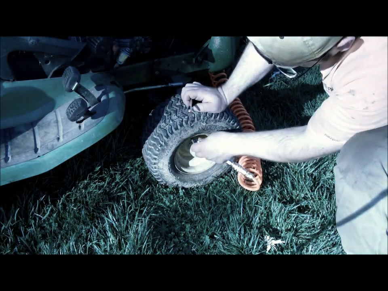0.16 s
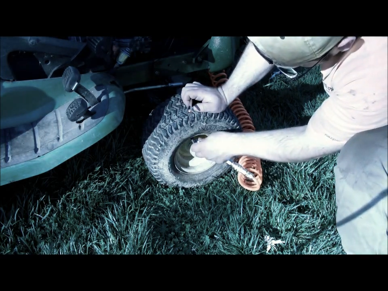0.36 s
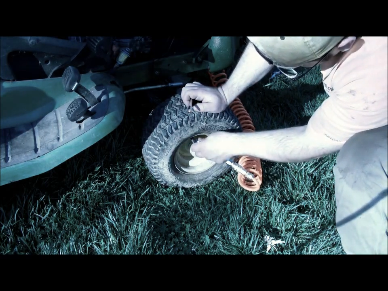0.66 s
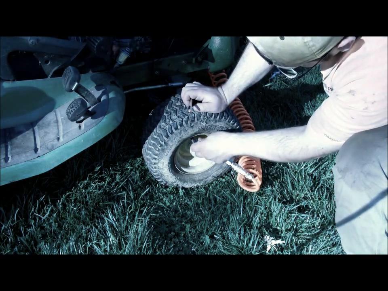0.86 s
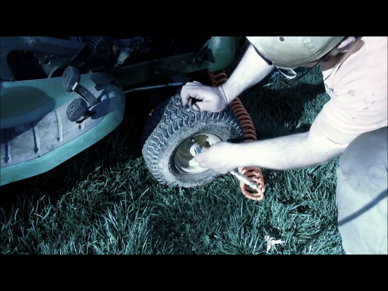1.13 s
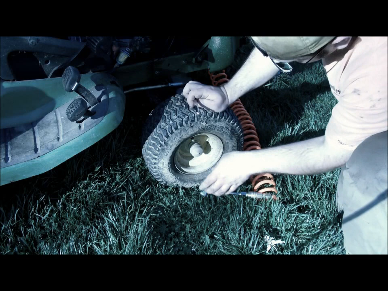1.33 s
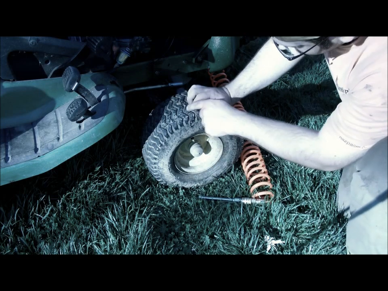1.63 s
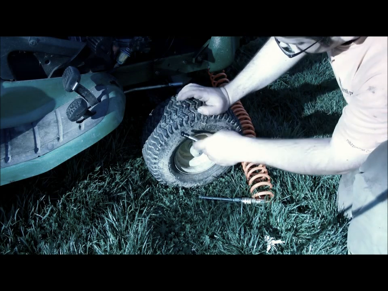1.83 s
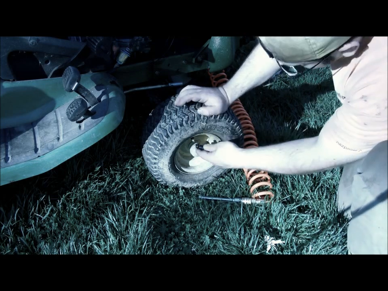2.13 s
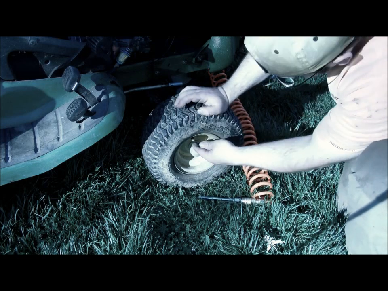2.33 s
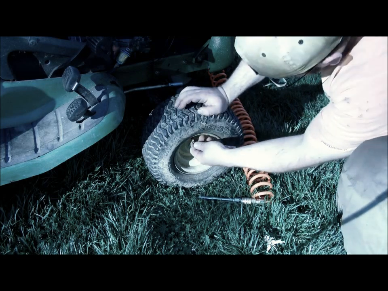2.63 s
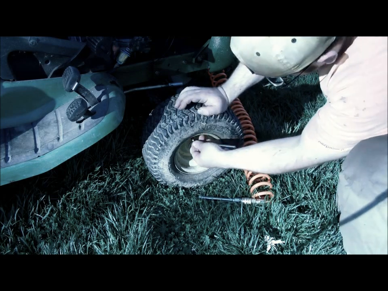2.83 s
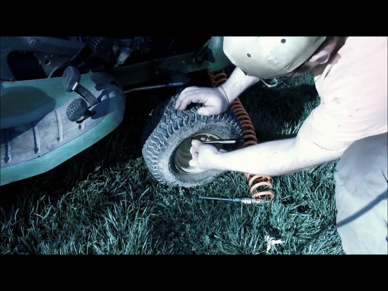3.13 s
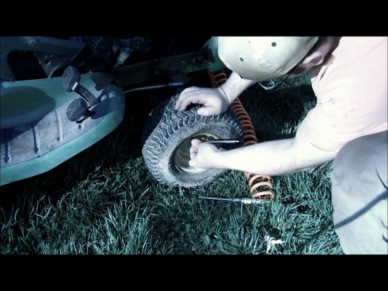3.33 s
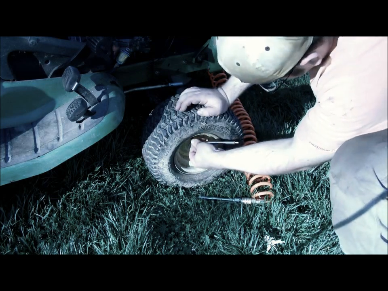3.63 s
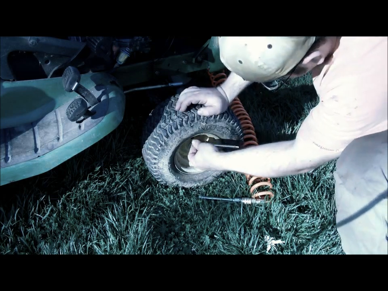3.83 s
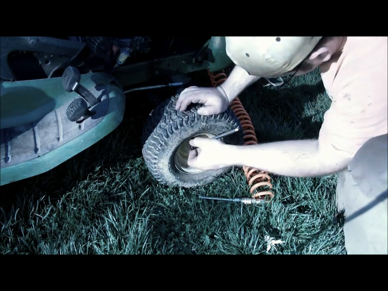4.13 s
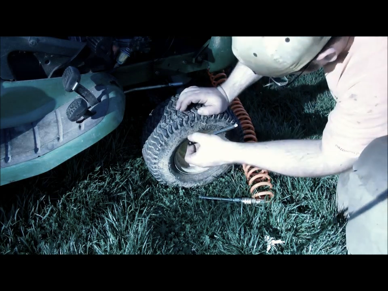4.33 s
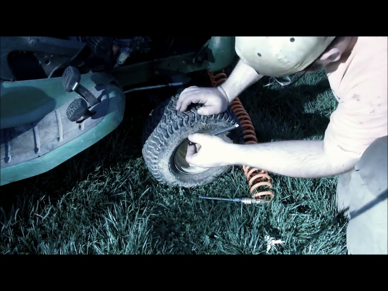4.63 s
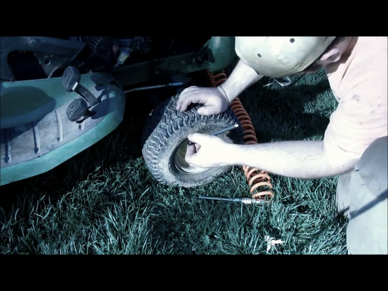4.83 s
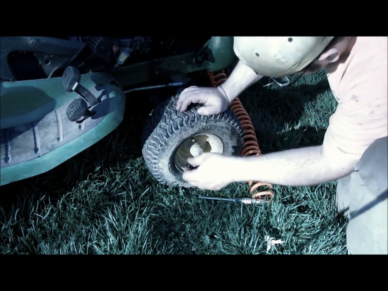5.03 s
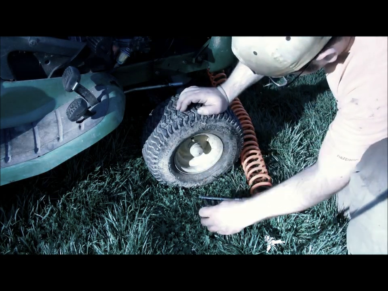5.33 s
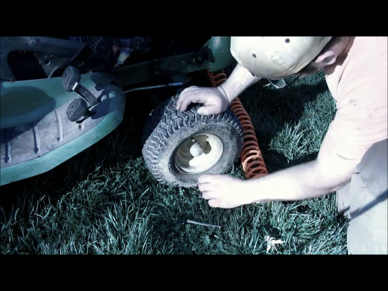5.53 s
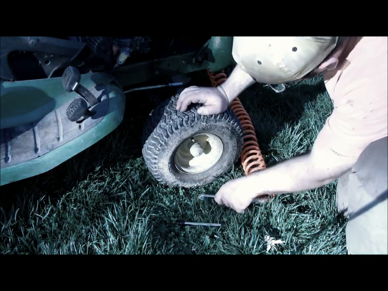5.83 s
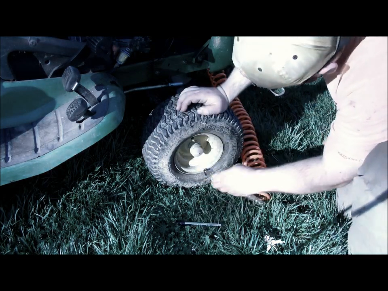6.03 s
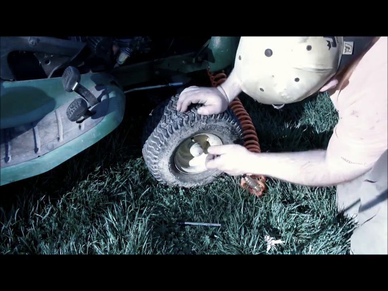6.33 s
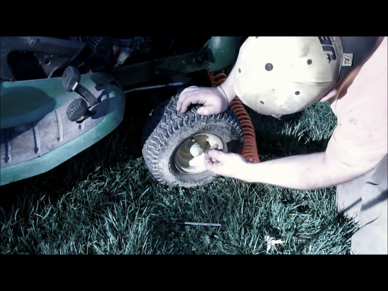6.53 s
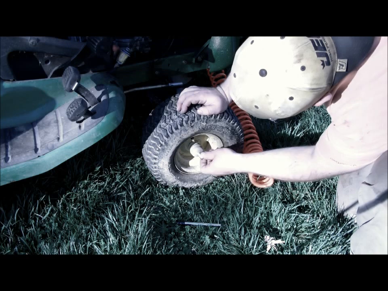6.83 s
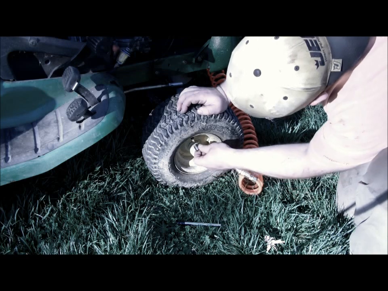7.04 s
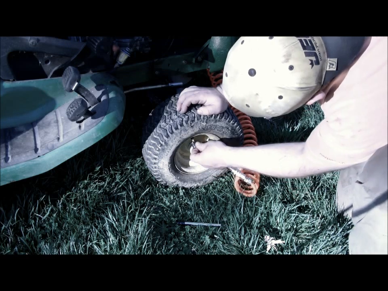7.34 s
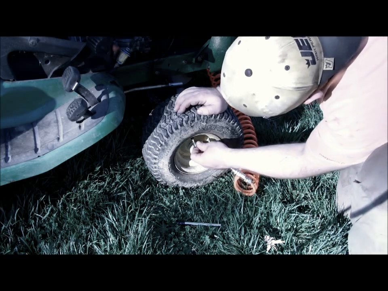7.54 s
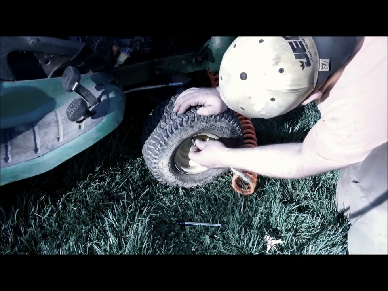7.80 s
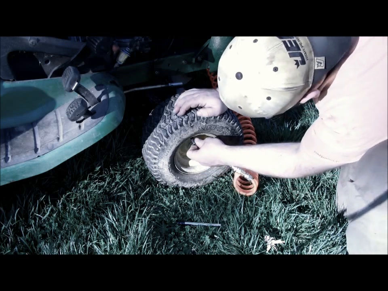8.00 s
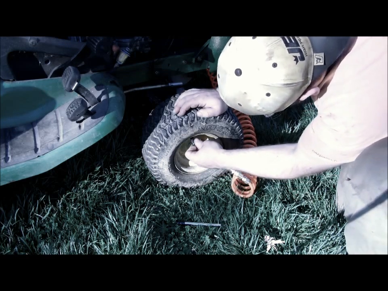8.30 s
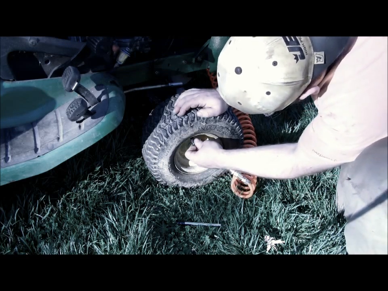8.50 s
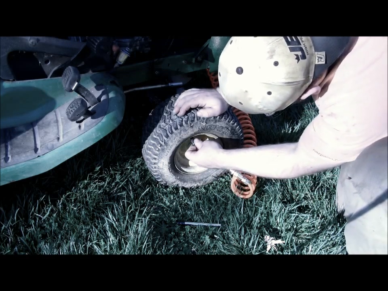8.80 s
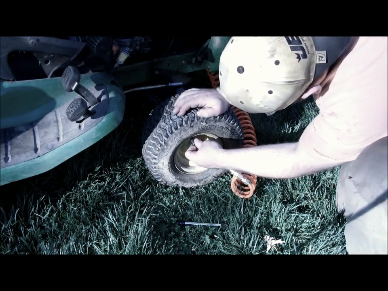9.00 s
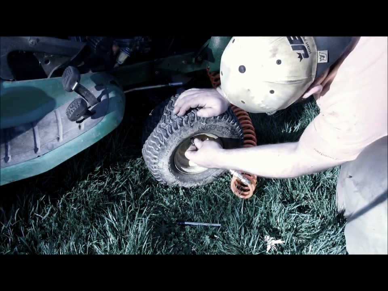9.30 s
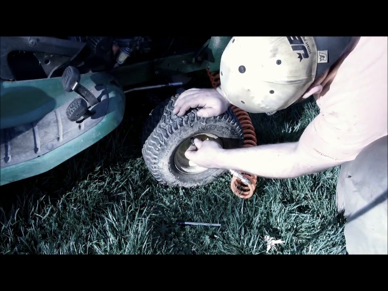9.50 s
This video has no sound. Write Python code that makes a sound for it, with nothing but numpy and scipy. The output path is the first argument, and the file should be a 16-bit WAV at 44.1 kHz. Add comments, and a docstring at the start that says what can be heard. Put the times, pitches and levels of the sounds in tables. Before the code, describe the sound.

Outdoors on a lawn, faint birds, far traffic and light rustling sit behind a thin leak at a tyre valve. The air chuck comes off close by with a sharp spit and a tiny pop. A small piston compressor farther away starts, spins up quickly and drones steadily with a fine metallic rattle. A few tiny spits of air follow, and near the end comes one short, bright blast.

```python
"""Tyre valve and air compressor

Far traffic, rustling and faint birds. Close by, a hand works an air chuck on a tyre valve: a thin
leak, spits of air, a pop as it comes off, a seep and, late on, one longer blast. Across the lawn a
small piston compressor starts at 1.5 s, spins up in a quarter of a second and drones on: each stroke
rings tank, housing and valve reeds over magnetic hum and fan whirr."""
import sys
import numpy as np
from scipy import signal
from scipy.fft import rfft, irfft
from scipy.io import wavfile
from scipy.ndimage import uniform_filter1d

SR = 44100
rng = np.random.default_rng(int(sys.argv[2]) if len(sys.argv) > 2 else 0)


def persist_wave(psi):
    """Save psi, clipped to +-1, as 16-bit WAV."""
    counts = np.round(np.clip(psi, -1, 1) * 32767).astype(np.int16)
    wavfile.write(sys.argv[1], SR, np.atleast_2d(counts).T)


N = 426006
T = np.arange(N) / SR
STROKE_HZ, FAINT_EDGE_HZ = 72.8, 15250

# ambience: (frequency [Hz], left-right coherence [0-1])
YARD_COHERENCE = [(60, 0.78), (180, 1), (550, 0.84), (1650, 1), (4970, 0.56), (15000, 0.24)]
# spits and seep: (frequency [Hz], relative density [dB])
SPIT_SPECTRUM = [(4710, -47), (8000, -16), (9350, -5.5), (11900, 3), (13500, -3.5), (14700, -7),
                 (15800, -14), (16000, -33)]
# chuck leaving the stem: (time [s], frequency [Hz], level [dB], t60 [s])
CHUCK_OFF = (1.203, 380, -40, .035)
# compressor: (frequency [Hz], left over right [dB])
PUMP_BALANCE = [(800, 1.1), (1000, 0), (5000, 0), (6400, 1.8), (8100, 4), (15000, 3)]


def gain_of(db):
    return 10 ** (np.asarray(db) / 20)


def unit_rms(x):
    return x / np.sqrt(np.mean(x ** 2) + 1e-20)


def drift(count, samples):
    """Unit-rms noise, smoothed over `samples`."""
    return unit_rms(uniform_filter1d(rng.standard_normal(count), size=samples))


def curve(points, top_hz=SR):
    """(Hz, value) points as a function of log frequency; 100 lower above top_hz."""
    f, value = np.transpose(points)
    return lambda hz: np.interp(np.log(hz + 1), np.log(f + 1), value) - 100 * (hz > top_hz)


def noise(colour_db, coherence, balance_db, patchy_db, count=N, lead_rad=np.zeros_like):
    """Unit-rms stereo noise with drifting patches; colour, coherence, balance, lead are curves in Hz."""
    frames, hz = count // 256 + 5, np.fft.rfftfreq(1024, 1 / SR)
    a, b, c, d, patches = rng.standard_normal((frames, 513, 5)).T
    patches = unit_rms(uniform_filter1d(uniform_filter1d(patches, size=10, axis=0), size=10, axis=1))
    alike, common = np.clip(coherence(hz), -1, 1)[:, None], a + 1j * b
    left = common * np.exp(1j * lead_rad(hz))[:, None]
    right = alike * common + np.sqrt(1 - alike ** 2) * (c + 1j * d)
    side_db = np.outer([.5, -.5], balance_db(hz))[..., None]
    spectra = np.array([left, right]) * gain_of(colour_db(hz)[:, None] + patchy_db * patches + side_db)
    return unit_rms(signal.istft(spectra, nperseg=1024, noverlap=768)[1][:, :count])


def yard_noise(colour_db, patchy_db):
    """Wide noise, slightly left."""
    return noise(colour_db, curve(YARD_COHERENCE), curve([(100, 1.2), (4000, .17), (9000, 1)]), patchy_db)


def traffic():
    """Far rumble, wandering in level."""
    # (frequency [Hz], relative density [dB])
    spectrum = [(25, -28), (55, -25), (120, -8.5), (280, -6.5), (540, 1.5), (950, 2), (1400, -4.5),
                (2500, -40.5)]
    # (time [s], level [dB])
    levels = [(0, -60.5), (.29, -58.5), (.55, -61.5), (.88, -63), (1.0, -57), (1.2, -57.5), (1.38, -62),
              (1.5, -60)]
    level_db = np.interp(T, *np.transpose(levels)) + 1.4 * drift(N, 3000)
    return yard_noise(curve(spectrum, 2500), patchy_db=1.6) * gain_of(level_db)


def rustle():
    """Cloth and grass: a thin bed with a few swishes."""
    # (frequency [Hz], relative density [dB])
    spectrum = [(900, -8.5), (1500, -4), (3700, -5.5), (6500, -8.5), (9000, -12), (12000, -9.5),
                (15200, -18)]
    # (centre [s], half-length [s], level [dB])
    swishes = [(.3, 0.18, -62.5), (0.553, 0.072, -62), (0.864, 0.095, -57.5), (1.013, 0.053, -55.5),
               (1.402, 0.044, -60)]
    power = gain_of(-63) ** 2
    power += sum(gain_of(db) ** 2 * np.exp(-((T - s) / half_s) ** 2) for s, half_s, db in swishes)
    return yard_noise(curve(spectrum, FAINT_EDGE_HZ), patchy_db=2.9) * np.sqrt(power)


def leak(level_db=-56, end_s=1.18):
    """Air creeping past the chuck seal whistles in narrow bands."""
    # (centre [Hz], width [Hz], relative level [dB])
    bands = [(10800, 170, -2), (11300, 170, 0), (12750, 220, -1), (13950, 130, 0), (11500, 5000, -11)]

    def colour_db(hz):
        power = sum(gain_of(db) ** 2 / (1 + (2 * (hz - f) / width) ** 2) ** 2 for f, width, db in bands)
        return 10 * np.log10(power) - 100 * (hz > FAINT_EDGE_HZ)
    out = np.zeros((2, N))
    out[:, :2 * SR] = noise(colour_db, curve([(9000, .79)]), curve([(9000, 5.8)]), 1.5, count=2 * SR)
    return out * gain_of(level_db) * np.clip((end_s - T) / .015, 0, 1)


def birds():
    """Faint gliding whistles, some warbling."""
    # (start [s], length [s], first [Hz], last [Hz], level [dB], pitch waver [fraction])
    notes = [(.1, 0.12, 4200, 3800, -59, 0.09), (.33, .1, 3900, 4200, -59, .04),
             (0.498, .1, 4300, 4040, -61, .03), (.69, .07, 4220, 3900, -60, 0.06),
             (.565, 0.12, 2850, 2430, -62, .012), (.585, .085, 1570, 1460, -59, 0.03),
             (.86, .09, 8600, 8900, -58, .012), (1.1, .07, 2600, 2750, -67, .012),
             (1.235, .04, 4300, 3900, -68, .012)]
    out = np.zeros(N)
    for start_s, length_s, first_hz, last_hz, db, waver in notes:
        u = np.linspace(0, 1, round(length_s * SR))
        hz = first_hz + (last_hz - first_hz) * u
        hz *= 1 + waver * drift(SR // 4, 150)[:len(u)]
        envelope = gain_of(db) * np.sin(np.pi * u ** .7)
        out[round(start_s * SR):][:len(u)] += envelope * np.sin(2 * np.pi * np.cumsum(hz) / SR)
    return out


def jet(colour_db, core_db, body_trim_db):
    """Air jet: a bright core to the left over a duller body, fluttered by the rubber seal."""
    # core: (frequency [Hz], left phase lead [rad])
    lead = [(8700, 0), (9100, .7), (10200, 1.3), (11700, .1), (12100, -.7), (13000, .9), (13500, .1)]
    # (frequency [Hz], relative density [dB])
    body_spectrum = [(250, -55), (1200, -14), (2500, -10), (2900, -5), (3400, -11), (4300, -6), (4850, -2),
                     (5400, -7), (6400, -5), (9000, -6)]
    n = len(core_db)
    coherence = curve([(9000, .86), (14000, .88)])
    balance_db = curve([(7000, 1.8), (10000, 6.7), (15000, 4.8)])
    core = noise(colour_db, coherence, balance_db, 1.4, count=n, lead_rad=curve(lead))
    body = noise(curve(body_spectrum, 10600), np.ones_like, curve([(6000, 0), (9000, 2)]), .68, count=n)
    flutter = unit_rms(gain_of(.86 * drift(n, 50)))
    return flutter * gain_of(core_db) * (core + body * gain_of(body_trim_db - 14.5))


def spits(t60_s=.019):
    """Short escapes of air: steep rise, hold, dying tail."""
    # (start [s], length [s], core level [dB], body trim [dB])
    bursts = [(1.177, 0.0063, -32, -6), (1.185, 0.0055, -20.5, -1), (1.193, .011, -15.5, 0),
              (1.214, .001, -38, -14), (1.219, .001, -33, 3), (3.346, .003, -41, -8),
              (3.362, .003, -46, -8), (3.946, .005, -29.5, 3), (3.952, 0.00084, -21.5, -7),
              (3.959, .004, -29, -1), (3.972, .001, -32, 5), (7.684, .028, -51, 17),
              (7.718, .003, -13.5, 3)]
    # a sizzle as the motor switches on: same columns
    sizzle = [(1.477, .016, -47, 8)]
    out = np.zeros((2, N))
    for start_s, length_s, peak_db, body_trim_db in bursts + sizzle:
        span = slice(round(start_s * SR) - 2000, round(start_s * SR) + 6000)
        t = T[span] - start_s
        rise_s = .0006 + .43 * length_s * (length_s < .015)  # a steady hiss starts at once
        shape_db = np.where(t < 0, 8.8 * t / rise_s, -60 * np.maximum(t - length_s, 0) / t60_s)
        out[:, span] += jet(curve(SPIT_SPECTRUM), peak_db + shape_db, body_trim_db)
    return out


def pop():
    """Hollow thump of the chuck leaving the stem."""
    start_s, hz, db, t60_s = CHUCK_OFF
    t = np.maximum(T - start_s, 0)
    return gain_of(db - 60 * np.minimum(t / t60_s, 3)) * np.sin(2 * np.pi * hz * t) * (t < 3 * t60_s)


def seep():
    """The valve seeps on once the chuck is off."""
    # (time [s], core level [dB])
    levels = [(1.2, -48), (1.23, -63), (1.33, -63), (1.4, -54), (1.45, -61)]
    core_db = np.interp(T, *np.transpose(levels))
    return jet(curve(SPIT_SPECTRUM, FAINT_EDGE_HZ), core_db, body_trim_db=-6) * (T > CHUCK_OFF[0])


def hum(turns, slip, hum_hz=240, on_s=1.474, surge_db=7.5):
    """Magnetic hum beating with the shaft; current surges at the start."""
    # (offset from hum_hz [stroke rates], rms level at speed [dB])
    beats = [(0, -60.5), (3, -65), (6, -69.5), (8, -69), (12, -68.5)]
    tones = sum(np.sqrt(2) * gain_of(db) * np.sin(2 * np.pi * (hum_hz * T + k * turns))
                for k, db in beats)
    return tones * np.clip((T - on_s) / .0044, 0, 1) * gain_of(surge_db * np.clip(3 * slip, 0, 1))


def whirr(turns, slip, level_db=-47, on_s=1.476):
    """Fan, brushes and air around the motor, puffing once a stroke."""
    # (frequency [Hz], relative density [dB])
    spectrum = [(25, -21), (50, -26), (200, -10.5), (480, 0), (950, -10), (1200, -2.5), (2600, -7),
                (2950, -3), (3200, -7.5), (5500, -9.5), (6150, -4.5), (6400, -0.5), (6650, -4),
                (7200, -7.5), (8100, -4.5), (8600, -7.5), (13000, -4), (15100, -11.5)]
    # (frequency [Hz], left-right coherence [0-1])
    coherence = [(60, .98), (150, 1), (2700, 1), (2950, .92), (3200, 1), (5000, 1), (6000, .8), (8000, .45),
                 (15000, .1)]
    air = noise(curve(spectrum, FAINT_EDGE_HZ), curve(coherence), curve(PUMP_BALANCE), patchy_db=.95)
    puffing = 1 + .025 * np.cos(2 * np.pi * (turns - .55))
    return air * puffing * gain_of(level_db - 7.1 * slip) * np.clip((T - on_s) / .028, 0, 1)


def housing_ring(orders):
    """Ring of tank and housing, delayed by band so each stroke sounds spread out, less peaky."""
    # (frequency [Hz], delay [strokes])
    lags = [(190, 0.049), (240, 0.44), (420, 0.32), (470, 0.65), (530, 0.5), (600, 0.038), (900, 0.319),
            (1000, 0.598), (1300, 1.049), (1450, 0.296), (1900, 1.092), (2100, 0.065), (2500, 0.355),
            (2800, 0.37), (3100, 0.595), (3500, 0.08)]
    hz = np.fft.rfftfreq(16384, 1 / SR)
    k, db = np.transpose(orders)
    colour_db = np.interp(hz, np.r_[0, k, k[-1] + 1] * STROKE_HZ, np.r_[db[0] - 20, db, db[-1] - 20])
    log_gain = np.log(gain_of(colour_db))
    phase = -signal.hilbert(np.r_[log_gain, log_gain[-2:0:-1]]).imag[:len(hz)]  # minimum phase
    phase -= 2 * np.pi * np.cumsum(curve(lags)(hz)) * hz[1] / STROKE_HZ
    return irfft(np.exp(log_gain + 1j * phase))[:8192]


def tank(turns, slip, pressure, blow_gain):
    """One blow a stroke rings tank and housing; colour follows speed and pressure."""
    # slow strokes, dull with a 1.3 kHz clank: (multiple of STROKE_HZ, gain [dB])
    slow_orders = [(2, -28), (3.3, -18), (5, -11), (7, 7.5), (8.5, -32), (14, -37), (18, -6), (20, -31),
                   (40, -37), (48, -23)]
    # at speed, tank low and tank full: same columns
    low_orders = [(1, -55), (2, -20), (3, -3.5), (4, -12.5), (5, -7), (6, -2), (7, 1.5), (8, -11.5),
                  (9, -20.5), (10, -23), (11, -23.5), (12, -22.5), (13, -44.5), (14, -22), (15, -18.5),
                  (16, -14.5), (17, -25.5), (18, -26), (19, -22), (20, -29.5), (21, -26.5), (22, -30.5),
                  (23, -23.5), (24, -27), (25, -21.5), (26, -31.5), (27, -23.5), (28, -25), (29, -41),
                  (30, -21), (31, -16.5), (32, -12.5), (33, -37), (34, -41), (35, -25.5), (36, -38),
                  (37, -29), (38, -24.5), (39, -17.5), (40, -10), (41, -36.5), (42, -27.5), (43, -43),
                  (44, -51), (45, -18), (46, -25), (47, -30.5), (48, -18.5)]
    full_orders = [(1, -62), (2, -20), (3, -2), (4, -11), (5, -9.5), (6, -3), (7, 1), (8, -10), (9, -23),
                   (10, -17.5), (11, -21), (12, -15.5), (13, -56), (14, -33), (15, -20), (16, -25),
                   (17, -28.5), (18, -41), (19, -36), (20, -20.5), (21, -12.5), (22, -27), (23, -16),
                   (24, -32), (25, -17), (26, -42.5), (27, -16.5), (28, -65), (29, -17), (30, -17),
                   (31, -21), (32, -45), (33, -29), (34, -33), (35, -68), (36, -41), (37, -52), (38, -29),
                   (39, -18), (40, -9.5), (41, -17.5), (42, -12.5), (43, -38), (44, -21), (45, -16.5),
                   (46, -36), (47, -60), (48, -22)]
    half_angle = np.pi * (turns + 1e-9)
    blows = (np.sin(97 * half_angle) / np.sin(half_angle) - 1) * blow_gain  # 48 harmonics
    slow, low, full = (signal.oaconvolve(blows, housing_ring(orders))[:N]
                       for orders in (slow_orders, low_orders, full_orders))
    at_speed = (1 - pressure) * low + pressure * full
    slow_share = np.minimum(3.4 * slip, 1)
    return .39 * (slow_share * slow + (1 - slow_share) * at_speed)  # 0 dB blows: about unit rms


def struck_mode(turns, stroke_hz, hz, db, t60_s, place, scatter):
    """A mode struck once a stroke, with scatter in level and phase."""
    stroke = np.floor(turns - place + 1).astype(int)
    since_s = (turns - place + 1 - stroke) / stroke_hz
    envelope = gain_of(db + .65 * scatter[stroke, 0] - 60 * since_s / t60_s)
    contact = np.minimum(since_s / .0013, 1) * (stroke > 0)
    return contact * envelope * np.sin(2 * np.pi * hz * since_s + .23 * scatter[stroke, 1])


def reeds(turns, stroke_hz, slip, pressure, scatter):
    """Valve reeds and cover ring on every stroke."""
    # (mode frequency [Hz])
    modes_hz = [3750, 4297, 4700, 5230, 5890, 6400, 6850, 7170, 7690, 8130, 8450, 8850, 9200, 9670, 10040,
                10340, 10750, 11200, 11700, 12280, 12820, 13200]
    # per mode: (level [dB], gain at full pressure [dB], t60 [s], place in stroke [turns])
    modes = [(-54, -11, 0.063, 0.57), (-59.5, 0, 0.07, 0.84), (-53, -2.5, 0.029, 0.25),
             (-56.5, 2.5, 0.071, .52), (-54, -4, 0.047, 1), (-39.5, 0, 0.026, .92), (-59, 9, 0.03, 0.534),
             (-55, 0, 0.067, 0.41), (-57.5, 0, 0.067, 0.514), (-49.5, 1.5, 0.053, 0.477),
             (-53.5, 1, 0.018, .1), (-49.5, 1, 0.022, 1), (-60, 0, 0.026, .3), (-51.5, -2, 0.044, 0.5),
             (-61, -4, 0.048, .6), (-51, -1, 0.072, 0.12), (-51, 2, 0.044, .4), (-47.5, -1.5, 0.04, 0.66),
             (-62, 10, 0.034, .15), (-56, 8, .04, .35), (-53.5, -3, 0.077, .5), (-61, 3, 0.037, 0.74)]
    out = np.zeros(N)
    for k, (db, fill_db, t60_s, place) in enumerate(modes):
        level_db = db + fill_db * pressure - 22 * slip
        out += struck_mode(turns, stroke_hz, modes_hz[k], level_db, t60_s, place, scatter[:, k])
    return out


def squeal(turns, stroke_hz, scatter, hz=2908, rise_db_per_s=400, fall_db_per_s=98):
    """A squeal flares twice as the speed settles."""
    # (time [s], peak level [dB])
    flares = [(1.65, -43), (1.8, -36)]
    flares_db = [db - np.where(T < s, rise_db_per_s * (s - T), fall_db_per_s * (T - s))
                 for s, db in flares]
    level_db = np.max(flares_db, axis=0).clip(-120)
    return struck_mode(turns, stroke_hz, hz, level_db, t60_s=.1, place=.5, scatter=scatter)


def whine(turns, stroke_hz, scatter, hz=4297, peak_db=-55, peak_s=3.85, width_s=1.2):
    """A thin whine swells and fades while the tank fills."""
    level_db = (peak_db - 8 * ((T - peak_s) / width_s) ** 2).clip(-120)
    return struck_mode(turns, stroke_hz, hz, level_db, t60_s=.089, place=.7, scatter=scatter)


def compressor(start_s=1.499, top_hz=72.86, fill_s=3.5):
    """The pump nears top speed fast, then creeps; its shaft times every part as the tank fills."""
    # (frequency [Hz], left phase lead [rad])
    lead = [(5000, 0), (6400, -0.51), (8100, -1.36), (9700, -1), (11200, -1.8)]
    on, t = T >= start_s, np.maximum(T - start_s, 0)
    stroke_hz = top_hz - 27 * np.exp(-t / .07) - .6 * np.exp(-t / .75)
    turns = np.cumsum(stroke_hz * on) / SR - .1  # first blow a tenth of a turn in
    slip = np.clip(1 - stroke_hz / STROKE_HZ, 0, 1)
    pressure = .74 * (1 - np.exp(-t / fill_s))  # 0 empty, 1 full
    scatter = rng.standard_normal((int(turns[-1]) + 2, 24, 2))  # stroke, part, level or phase
    lurch_db = 5 * np.exp(-((t - .08) / .018) ** 2)  # a few early blows land harder
    uneven_db = (.1 + 6 * slip) * scatter[np.round(turns).astype(int), -1, 0]
    blow_db = -35.5 - 13 * (1 - stroke_hz / top_hz) + lurch_db + uneven_db
    mono = hum(turns, slip) + tank(turns, slip, pressure, gain_of(blow_db) * on)
    mono += reeds(turns, stroke_hz, slip, pressure, scatter)
    mono += squeal(turns, stroke_hz, scatter[:, -2]) + whine(turns, stroke_hz, scatter[:, 1])
    hz = np.fft.rfftfreq(N, 1 / SR)
    balance = gain_of(np.outer([.5, -.5], curve(PUMP_BALANCE)(hz)))
    phase_shift = np.exp(np.outer([.5j, -.5j], curve(lead)(hz)))
    return irfft(rfft(mono) * balance * phase_shift * (hz < FAINT_EDGE_HZ), N) + whirr(turns, slip)


def blast(start_s=7.716, open_s=.0081, swell_s=7.88, shut_s=7.9, end_s=7.958):
    """A longer jet: opens with a kick, swells late, shuts off; its body thins throughout."""
    # core: (frequency [Hz], relative density [dB])
    spectrum = [(5000, -67), (7800, -31), (9000, -13), (9900, -3.5), (10350, 3.5), (11000, -0.5),
                (12500, -7), (13700, -5), (15000, -9), (15400, -14)]
    span = slice(round(7.71 * SR), round(7.97 * SR))
    t = T[span]
    since_s = np.maximum(t - start_s, 0)
    kick_db = 3 * np.exp(-since_s / .025)
    swell_db = 2.5 * np.exp(-((t - swell_s) / .044) ** 2)
    shut_db = -28 * (np.maximum(t - shut_s, 0) / (end_s - shut_s)) ** 3
    body_trim_db = np.interp(t, [start_s, end_s], [4, -3.5])
    opening = np.minimum(since_s / open_s, 1) ** 2
    out = np.zeros((2, N))
    out[:, span] = jet(curve(spectrum, 14900), -20 + kick_db + swell_db + shut_db, body_trim_db) * opening
    return out


def scene():
    return compressor() + traffic() + rustle() + birds() + leak() + blast() + spits() + seep() + pop()


def record(dry):
    """Low-pass at 16.1 kHz."""
    return signal.oaconvolve(dry, signal.firwin(511, 16100, window=("kaiser", 9), fs=SR)[None], "same")


dry = scene()
out = record(dry)
persist_wave(out)
```